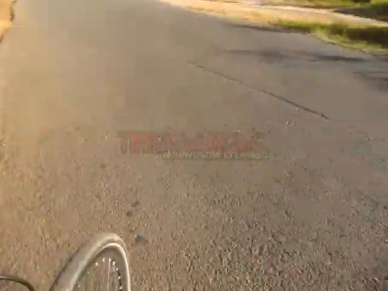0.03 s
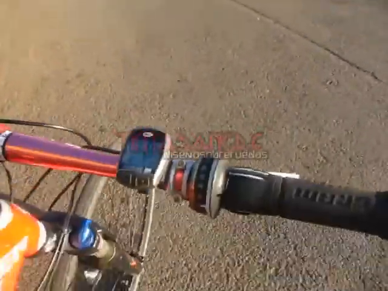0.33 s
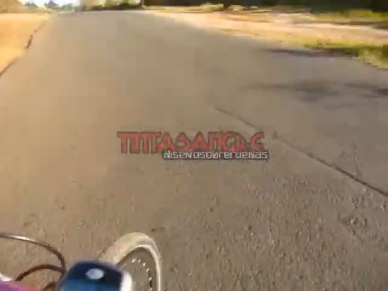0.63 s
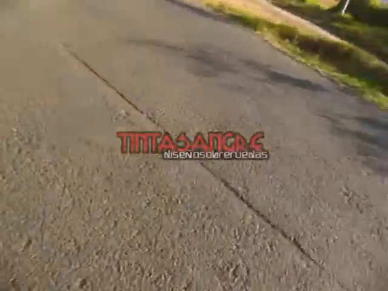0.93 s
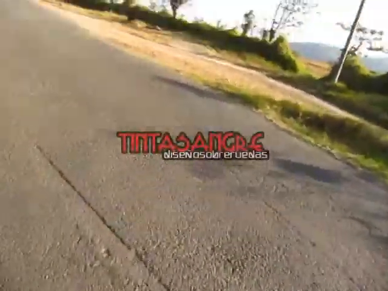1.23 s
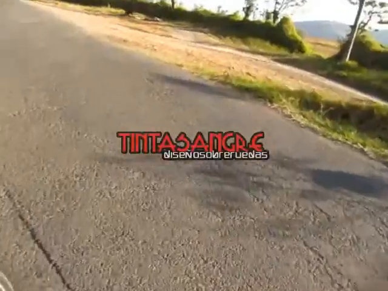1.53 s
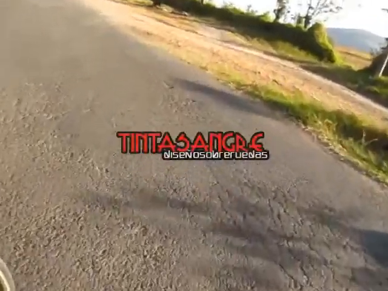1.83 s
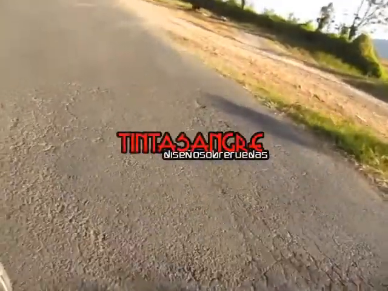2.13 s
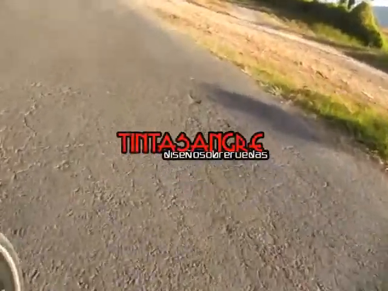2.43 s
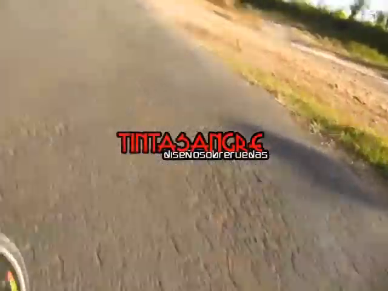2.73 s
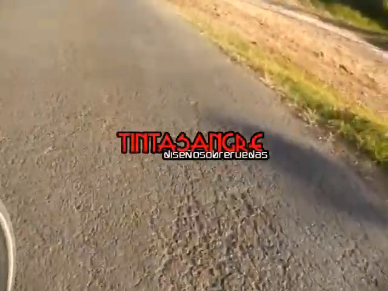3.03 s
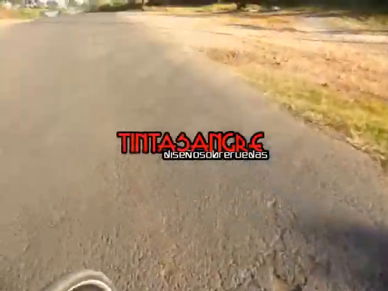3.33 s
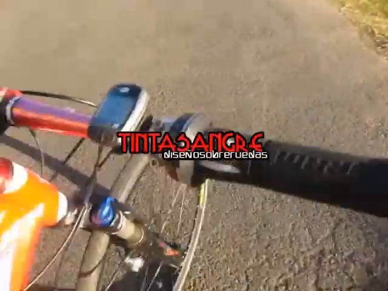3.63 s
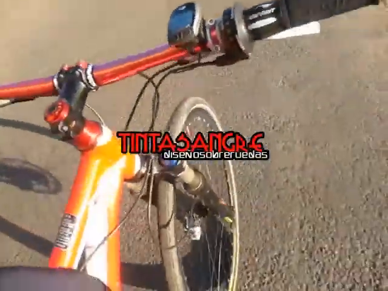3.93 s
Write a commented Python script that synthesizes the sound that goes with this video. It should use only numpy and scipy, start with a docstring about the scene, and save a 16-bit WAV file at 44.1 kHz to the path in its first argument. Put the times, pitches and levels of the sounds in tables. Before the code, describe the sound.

A bicycle changes gear close by, over low wind buffeting the microphone and faint tyre hiss. Light ticks come first. The shifter snaps three times around 1.6 seconds, twice near 2.1 and once at 2.5. The chain clatters across the sprockets with a brief metallic ring around 2.5, 2.8, 3.2 and 3.5 seconds. Faint, high double squeaks come near 1, 2 and 3 seconds.

```python
"""A bicycle changes gear, heard from the rider's seat: the shifter snaps through its notches and the
chain ticks and clatters across the sprockets, setting the frame ringing. A dry metal part squeaks
twice on each turn of the pedals, and loose parts knock and creak faintly. Underneath lies a bed of
tyre hiss on asphalt, with wind rumbling and buffeting on the microphone."""
import sys
import numpy as np
from scipy import signal
from scipy.fft import rfft, irfft
from scipy.io import wavfile
from scipy.ndimage import uniform_filter1d

SR = 44100
rng = np.random.default_rng(int(sys.argv[2]) if len(sys.argv) > 2 else 0)


def to_wav(s):
    """Save 16-bit WAV."""
    ch = np.atleast_2d(s).T  # columns
    pcm = np.round(np.clip(ch, -1, 1) * 32767)  # PCM
    wavfile.write(sys.argv[1], SR, pcm.astype(np.int16))


N = 176400

# Shifter cues, one per notch: t/s, level/dB, body f/Hz, bass/dB, treble/dB
SNAP_CUES = [(1.604, -7.5, 1970, 3, 1.5), (1.6414, -9, 2210, 4.5, 6.5), (1.680, -6.5, 1910, -7, 2),
             (2.058, -4.5, 2770, -7.5, -1.5), (2.1063, -7, 2350, -5.5, -1), (2.534, -4, 2050, -6.5, -2.5)]
# Tone of the shifter housing: f/Hz, level/dB
HOUSING_EQ = [(100, -11), (1050, 3.5), (1350, -1.5), (5600, -1.5), (9500, -13.5), (12700, -12.5),
              (16000, -44)]
# The chain slaps onto a sprocket: t/s, level/dB, treble/dB, hold/s, body f/Hz
SLAP_CUES = [(2.433, -16.5, -25, 0.0033, 850), (2.463, -9, -6.5, 0.016, 1060),
             (2.497, -0.5, -0.5, 0.0093, 1040), (2.776, -2, -4.5, 0.0034, 1470),
             (2.837, -11, -1.5, 0.029, 2000), (3.178, -1, -4.5, 0.0093, 760), (3.514, -3, 0.5, 0.008, 1110),
             (3.579, 1, -0.5, 0.021, 1060)]
# Tone of a slap: f/Hz, level/dB
SLAP_EQ = [(150, -11.5), (500, -2), (900, -4), (2100, -9), (7000, -26), (12500, -28), (15500, -44)]
# Resonances of frame and sprockets: f/Hz, level/dB
FRAME_MODES = [(520, -16), (745, -2), (830, -3), (1075, 1.5), (1250, -6.5), (1540, 0), (1930, 0),
               (2720, 4.5), (3020, 6.5)]
# Light ticks of chain and cables: t/s, level/dB, treble/dB, decay/s
TICK_CUES = [(0.617, -43.5, 13, 0.0036), (0.9605, -22.5, -1, 0.0013), (1.238, -34.5, -0.5, 0.0017),
             (2.0082, -14.5, -3.5, 0.00087), (2.484, -22.5, -2, 0.0093), (2.497, -24, -11, 0.0037),
             (2.659, -32, -11, 0.0015), (2.8, -29.5, 5.5, 0.0042), (2.872, -22, -4, 0.0011),
             (3.223, -40, 6, 0.0018), (3.3073, -21.5, -9, 0.0021), (3.518, -38, 22, 0.0022),
             (3.545, -32.5, 9, 0.0017), (3.597, -40, 14, 0.023)]
# Tone of a tick: f/Hz, level/dB
TICK_EQ = [(300, -29), (1500, 0.5), (5000, -6.5), (8000, 0.5), (12800, -5), (14500, -37)]
# Squeaks, two per pedal turn: t/s, level/dB, final f/Hz, overtones/dB
SQUEAK_CUES = [(.967, -47, 3656, -1), (1.084, -43.5, 3480, 3.5), (2.06, -48.5, 3650, -19),
               (2.179, -49.5, 3480, 6.5), (3.119, -52.5, 3620, -7), (3.229, -50.5, 3475, 3.5)]
# Resonances of the squeaking part at SQUEAK_REFERENCE_HZ: f/Hz, level/dB
METAL_MODES = [(1950, -8), (2230, -15.5), (2760, -7.5), (3350, -3.5), (3550, 0), (4900, -10), (5550, -1.5),
               (6620, -9), (9150, -2), (11500, 1.5), (13500, -2)]
# Soft knocks on the frame: t/s, level/dB, centre f/Hz
KNOCK_CUES = [(0.316, -31.5, 2260), (1.412, -34.5, 1380), (3.09, -33.5, 2500)]
# Creaks of loose parts: t/s, level/dB, centre f/Hz
CREAK_CUES = [(0.848, -41.5, 3070), (2.718, -38.5, 2280), (2.909, -38.5, 2530)]
# Fader shared by tyres and running chain: t/s, level/dB
ROLLING_FADER = [(0, -77), (1.0, -72.5), (1.28, -75.5), (1.45, -68), (1.77, -73.5), (1.87, -69),
                 (2.35, -73), (3.0, -78), (4, -76.5)]
# Tone of tyres on asphalt: f/Hz, level/dB
TYRE_EQ = [(100, 6), (450, 0.5), (2000, -1.5), (4000, -13), (16000, -25.5)]
# Tone of the chain's patter and the squeak's rasp: f/Hz, level/dB
METAL_EQ = [(800, -8), (2500, 2), (9000, -4.5), (12500, -7), (16000, -43)]
# Eddies hit the microphone: centre t/s, length/s, level/dB
BUFFET_CUES = [(0.237, 0.021, -39), (0.763, 0.012, -33), (0.818, 0.008, -31.5), (0.833, 0.039, -35.5),
               (0.884, 0.022, -33), (0.929, 0.057, -36.5), (1.509, 0.025, -38.5), (1.793, 0.016, -38),
               (1.887, 0.043, -44), (2.672, 0.0089, -33), (2.95, 0.045, -42.5), (3.186, 0.074, -39),
               (3.423, 0.019, -40), (3.902, 0.0097, -38.5)]
# Tone of an eddy at EDDY_REFERENCE_DB: f/Hz, level/dB
EDDY_EQ = [(20, 0), (170, 1), (400, -3), (750, -14.5), (1100, -22.5), (4000, -94)]
# Fader shared by the wind's rumble and flutter: t/s, level/dB
WIND_FADER = [(0, -45), (.25, -37.5), (.38, -40.5), (.77, -35), (.88, -32), (1.15, -39.5), (2.05, -40),
              (2.28, -47), (2.63, -36.5), (2.83, -45.5), (3.2, -33), (3.36, -39.5), (3.57, -35.5), (4, -39)]
# Tone of the deep rumble: f/Hz, level/dB
RUMBLE_EQ = [(10, -16.5), (25, 2), (52, -0.5), (80, -9.5), (200, -31), (600, -94)]
# Tone of the flutter just above it: f/Hz, level/dB
FLUTTER_EQ = [(40, -37.5), (120, 4), (300, -9), (700, -23.5), (3000, -54)]

LINKS_PER_S, FRAME_DETUNE, GRIT_DB = 310, 0.013, 6
SQUEAK_REFERENCE_HZ, EDDY_REFERENCE_DB = 3480, -34


def shifter():
    """The pawl slides off a tooth, snaps into the next notch and rebounds once."""
    slide_s, rebound_s, decay_s, tail_s = 0.0008, 0.0056, 0.0013, 0.0093
    out, t = np.zeros(N), event_time()
    hz, decay = freqs(t), np.exp(-t / decay_s)
    crack = 0.36 * (t == 0)
    for start, db, body_hz, bass_db, treble_db in SNAP_CUES:
        slide = from_db(-5) * burst(decay)
        snap = energy_one(burst(decay) - crack)
        tail = from_db(-15) * burst(np.exp(-t / tail_s))
        rebound = from_db(-11.5) * burst(decay)
        force = np.zeros(len(t))
        add(force, 0, slide)
        add(force, slide_s, snap + tail)
        add(force, slide_s + rebound_s, rebound)
        body_db = at_hz(HOUSING_EQ, hz) + 11 * bell(hz, body_hz)
        shelves_db = bass_db * (1 - shelf(hz, corner_hz=1520)) + treble_db * shelf(hz, corner_hz=5940)
        add(out, start - slide_s, colour(force, db + body_db + shelves_db))
    return out


def chain_slaps():
    """A run of links lands on the teeth, one after another, and sets the frame ringing."""
    release_s, tail_s, link_contrast = 0.0069, 0.045, 0.74
    out, t = np.zeros(N), event_time()
    hz = freqs(t)
    for start, db, treble_db, hold_s, body_hz in SLAP_CUES:
        link_phase = (t * LINKS_PER_S + drift(rate_hz=32, size=len(t)) / 2) % 1
        landings = np.exp(-link_phase * link_contrast)
        gate = np.exp(-np.maximum(t - hold_s, 0) / release_s)
        links = burst(landings * gate, GRIT_DB)
        ring = excite(links, ringing(FRAME_MODES, cycles=84, detune=FRAME_DETUNE))
        settling = burst(landings * np.exp(-t / tail_s), GRIT_DB)
        clatter = links + from_db(-10) * ring + from_db(-2.5) * settling
        tone_db = at_hz(SLAP_EQ, hz) + 3 * bell(hz, body_hz) + treble_db * shelf(hz, corner_hz=2500)
        add(out, start, colour(clatter, db + tone_db))
    return out


def ticks():
    """Chain and cables make light, bright contacts with a short metallic tail."""
    tail_s = 0.015
    out, t = np.zeros(N), event_time()
    hz = freqs(t)
    for start, db, treble_db, decay_s in TICK_CUES:
        attack = burst(np.exp(-t / decay_s), grit_db=0.5)
        tail = from_db(-9.5) * burst(np.exp(-t / tail_s))
        tone_db = at_hz(TICK_EQ, hz) + treble_db * shelf(hz, corner_hz=6560)
        add(out, start, colour(attack + tail, db + tone_db))
    return out


def squeaks():
    """Dry friction sings a short falling note, raspy at its peak; the metal rings on unevenly."""
    attack_s, decay_s = 0.0125, 0.013
    sag, sag_s, jitter = 0.122, 0.0068, 0.023
    out, t = np.zeros(N), event_time()
    attack = np.minimum(t / attack_s, 1) ** 2
    grip = attack * np.exp(-np.maximum(t - attack_s, 0) / decay_s)
    for start, db, final_hz, overtones_db in SQUEAK_CUES:
        pitch = final_hz * (1 + sag * np.exp(-t / sag_s) + jitter * drift(rate_hz=290, size=len(t)))
        phase = 2 * np.pi * np.cumsum(pitch) / SR
        overtones = from_db(-12) * np.sin(3 * phase) + from_db(-19) * np.sin(4 * phase)
        grit = burst(np.ones(len(t)), GRIT_DB)
        rasp = from_db(-10.5) * rms_one(colour(grit, at_hz(METAL_EQ, freqs(t))))
        note = grip * (np.sin(phase) + from_db(overtones_db) * grip * (overtones + rasp))
        # The same load tunes both the note and the metal's ring.
        tuning = final_hz / SQUEAK_REFERENCE_HZ
        modes = [(hz * tuning, mode_db + overtones_db * shelf(hz, corner_hz=7840))
                 for hz, mode_db in METAL_MODES]
        ring = excite(burst(grip ** 2), ringing(modes, cycles=780, detune=0.0094))
        ring /= np.abs(ring).max()
        roughness = from_db(3.5 * drift(rate_hz=61, size=len(t)))
        add(out, start, from_db(db) * (note + roughness * ring))
    return out


def knocks():
    """A loose part nudges the frame, which rings freely."""
    decay_s = 0.01
    out, t = np.zeros(N), event_time()
    for start, db, centre_hz in KNOCK_CUES:
        nudge = burst(np.exp(-t / decay_s), GRIT_DB)
        ring = excite(nudge, ringing(FRAME_MODES, cycles=290, detune=FRAME_DETUNE))
        knock = colour(nudge + ring, band_db(freqs(t), centre_hz, octaves=1))
        add(out, start, from_db(db) * energy_one(knock))
    return out


def creaks():
    """Loose parts give faint, gritty rubs, each around one pitch."""
    decay_s = 0.01
    out, t = np.zeros(N), event_time()
    for start, db, centre_hz in CREAK_CUES:
        rub = burst(np.exp(-t / decay_s), GRIT_DB)
        creak = colour(rub, band_db(freqs(t), centre_hz, octaves=0.053))
        add(out, start, from_db(db) * energy_one(creak))
    return out


def rolling():
    """Tyres hiss on the asphalt beside the fine patter of chain links."""
    link_decay_s, link_spread_db = 0.0032, 3.5
    links = (rng.random(N) < LINKS_PER_S / SR) * from_db(link_spread_db * rng.standard_normal(N))
    patter = rms_one(signal.lfilter([1], [1, -np.exp(-1 / (link_decay_s * SR))], links))
    tyres = from_db(2) * noise(TYRE_EQ)
    chain = from_db(-4) * patter * noise(METAL_EQ)
    return from_db(automation(ROLLING_FADER)) * (tyres + chain)


def buffets():
    """Each eddy hits the microphone as a clump of pressure jolts, brighter when stronger."""
    jolts_per_s, octaves_per_db = 680, 0.1031
    out, t = np.zeros(N), event_time()
    middle = t[-1] / 2
    for centre_s, length_s, db in BUFFET_CUES:
        swell = np.exp(-2 * ((t - middle) / length_s) ** 2)
        jolts = burst(swell * (rng.random(len(t)) < jolts_per_s / SR))
        churn = from_db(-1) * burst(swell)
        brightness = 2 ** (octaves_per_db * (db - EDDY_REFERENCE_DB))
        eddy = energy_one(colour(jolts + churn, at_hz(EDDY_EQ, freqs(t) / brightness)))
        add(out, centre_s - middle, from_db(db) * np.sqrt(length_s * SR) * eddy)
    return out


def wind():
    """Air rumbles deeply on the microphone, with a lumpy flutter riding the same swells."""
    fader_db = automation(WIND_FADER)
    rumble = from_db(fader_db - 1) * leveller(noise(RUMBLE_EQ), window_s=0.0503)
    flutter_db = -56 + (fader_db - fader_db.mean()) + 4 * drift(rate_hz=30)
    return rumble + from_db(flutter_db) * noise(FLUTTER_EQ)


def from_db(db):
    """Decibels to gain."""
    return 10 ** (np.asarray(db) / 20)


def rms_one(x):
    """Normalise to unit power."""
    return x / np.sqrt(np.mean(x ** 2) + 1e-20)


def energy_one(x):
    """Normalise to the energy of a unit click."""
    return x / np.sqrt(np.sum(x ** 2) + 1e-20)


def automation(points):
    """A fader's position at every sample."""
    return np.interp(np.arange(N) / SR, *np.transpose(points))


def event_time():
    """Time axis of a one-shot, in seconds."""
    return np.arange(2 ** 14) / SR


def freqs(x):
    """Frequency axis of a sound, in Hz."""
    return np.maximum(np.arange(len(x) // 2 + 1) * SR / len(x), 1)


def at_hz(eq, hz):
    """Read an EQ curve in dB on a log-frequency axis."""
    points_hz, db = np.transpose(eq)
    return np.interp(np.log(hz), np.log(points_hz), db)


def shelf(hz, corner_hz):
    """High-shelf shape, rising from 0 to 1 around the corner."""
    return 1 / (1 + (corner_hz / hz) ** 4)


def bell(hz, centre_hz, octaves=0.26):
    """Shape of a body resonance, 1 at its centre."""
    return np.exp(-(np.log2(hz / centre_hz) / octaves) ** 2)


def band_db(hz, centre_hz, octaves):
    """Band-pass curve, 3 dB down at the given octaves either side of its centre."""
    return -10 * np.log10(1 + (np.log2(hz / centre_hz) / octaves) ** 4)


def colour(x, db):
    """Minimum-phase EQ with the given gain at each frequency."""
    cepstrum = irfft(np.log(from_db(db)))
    cepstrum[1:len(x) // 2] *= 2
    cepstrum[len(x) // 2 + 1:] = 0
    return irfft(rfft(x) * np.exp(rfft(cepstrum)))


def noise(eq):
    """Steady noise through an EQ curve, unit power."""
    white = rng.standard_normal(N)
    return rms_one(irfft(rfft(white) * from_db(at_hz(eq, freqs(white)))))


def drift(rate_hz, size=N):
    """Smooth random modulation, spread 1."""
    white = rng.standard_normal(size)
    return rms_one(irfft(rfft(white - white.mean()) / (1 + (freqs(white) / rate_hz) ** 2)))


def leveller(x, window_s):
    """Iron the chance swells out of a noise."""
    power = uniform_filter1d(x ** 2, max(int(window_s * SR), 2))
    return x / np.sqrt(np.abs(power) + 1e-12)


def burst(envelope, grit_db=0):
    """Noise under an envelope, roughened by grit; unit energy."""
    white, grains = rng.standard_normal((2, len(envelope)))
    return energy_one(white * from_db(grit_db * grains) * envelope)


def ringing(modes, cycles, detune, spread_db=2):
    """Struck pairs of detuned modes fade 60 dB over the given cycles, the highs up to twice as fast."""
    t, ring = event_time(), 0
    for hz, db in 2 * list(modes):
        strike_db = db + spread_db * rng.standard_normal()
        fade_db = 60 * t * hz / cycles * (1 + shelf(hz, corner_hz=5000))
        detuned_hz = hz * (1 + detune * rng.standard_normal())
        ring += from_db(strike_db - fade_db) * np.sin(2 * np.pi * (detuned_hz * t + rng.random()))
    return energy_one(ring)


def excite(force, response):
    """A body's answer to a force; unit energy."""
    return energy_one(signal.fftconvolve(force, response)[:len(force)])


def add(out, start_s, x):
    """Drop a sound into a track at its cue."""
    i = int(start_s * SR)
    x, i = x[max(-i, 0):], max(i, 0)
    out[i:i + len(x)] += x[:max(len(out) - i, 0)]


def scene():
    """Mono mix: the bicycle's mechanics over a bed of wind and road."""
    bed = wind() + buffets() + rolling()
    mechanics = shifter() + ticks() + chain_slaps() + squeaks() + knocks() + creaks()
    return (mechanics + bed)[None]


def record(dry):
    """A steep high cut takes off the very top."""
    cutoff_hz = 15900
    return signal.sosfilt(signal.ellip(10, .1, 80, cutoff_hz, fs=SR, output="sos"), dry)


dry = scene()
out = record(dry)
to_wav(out)
```